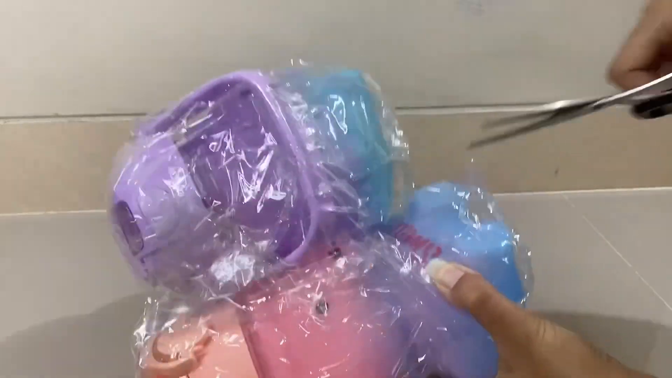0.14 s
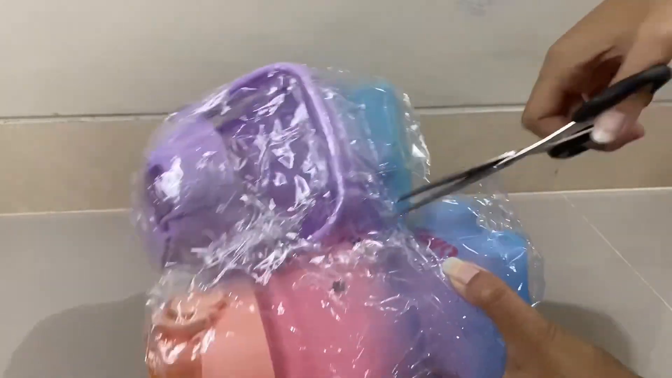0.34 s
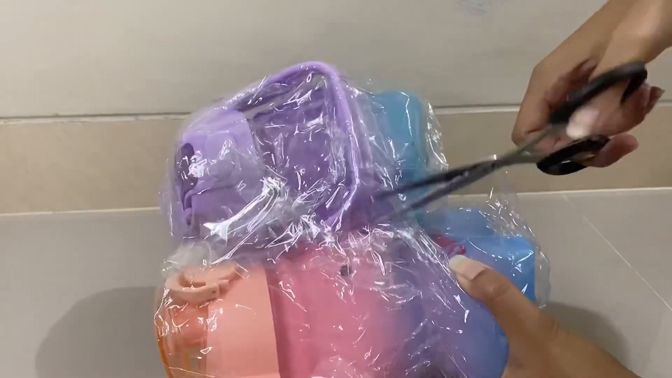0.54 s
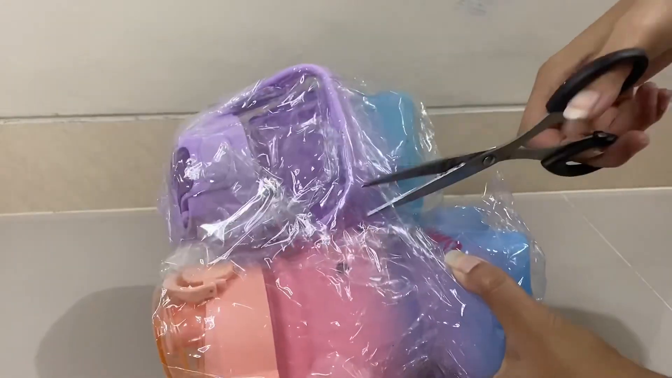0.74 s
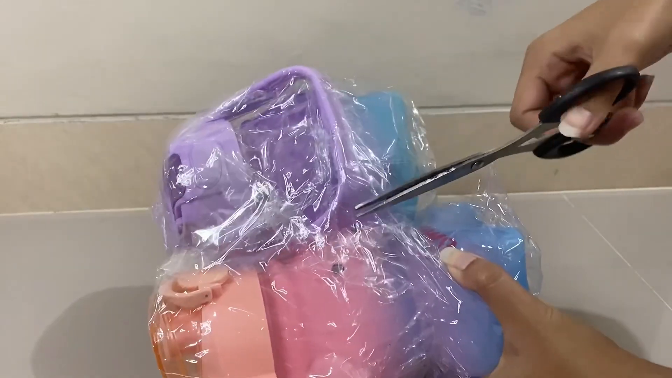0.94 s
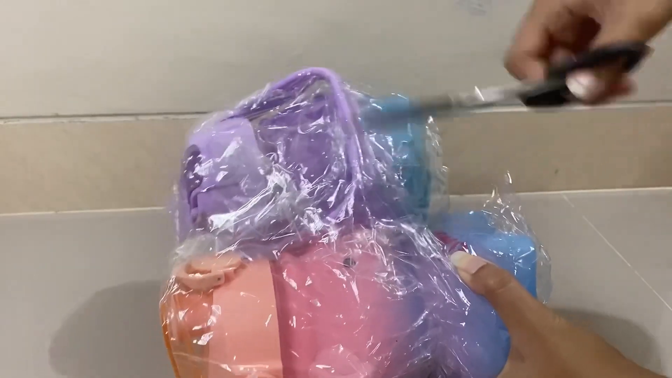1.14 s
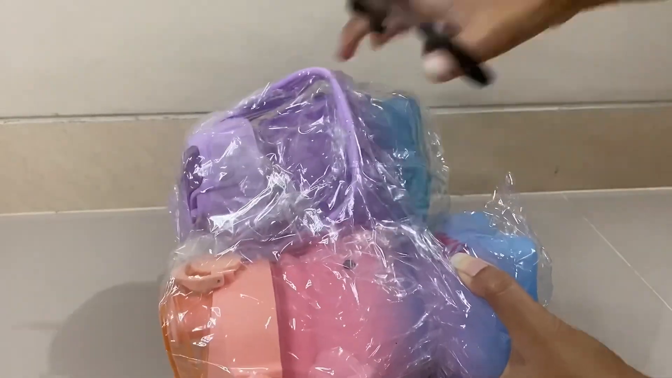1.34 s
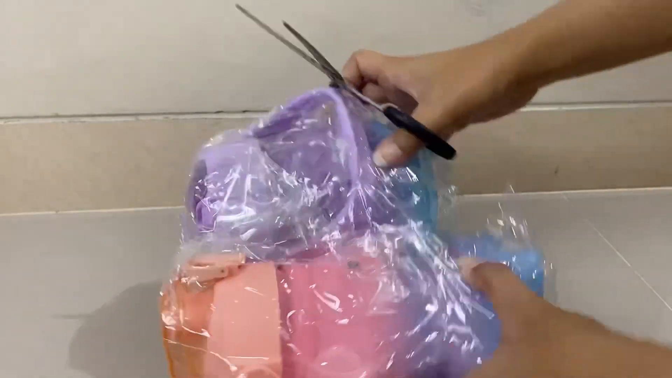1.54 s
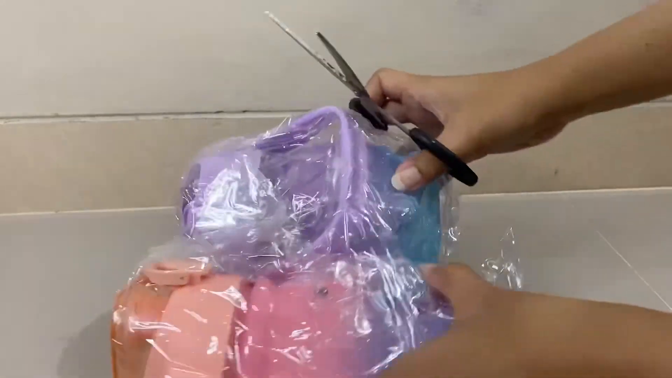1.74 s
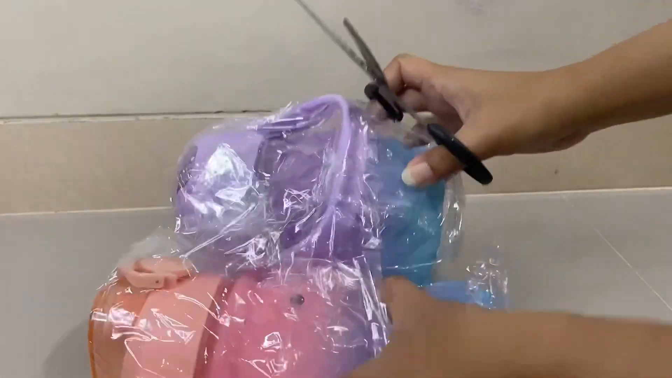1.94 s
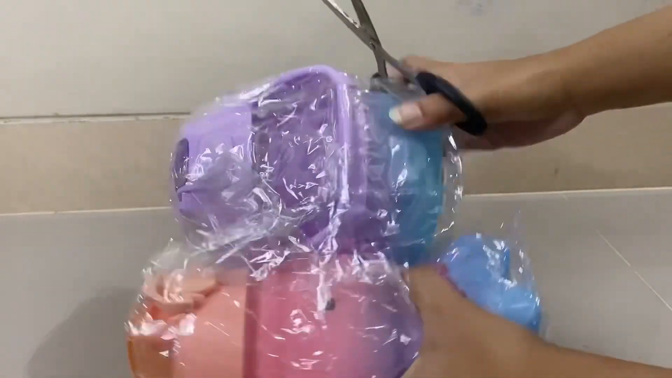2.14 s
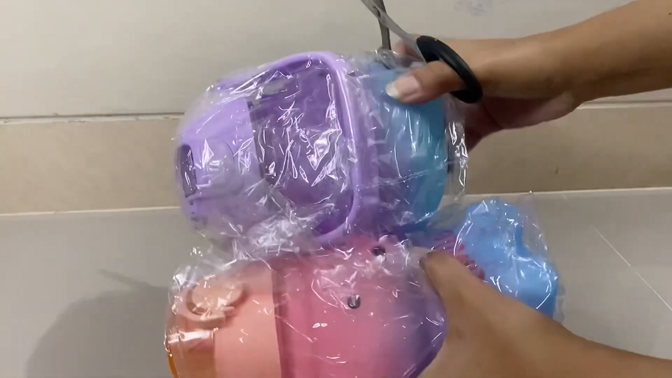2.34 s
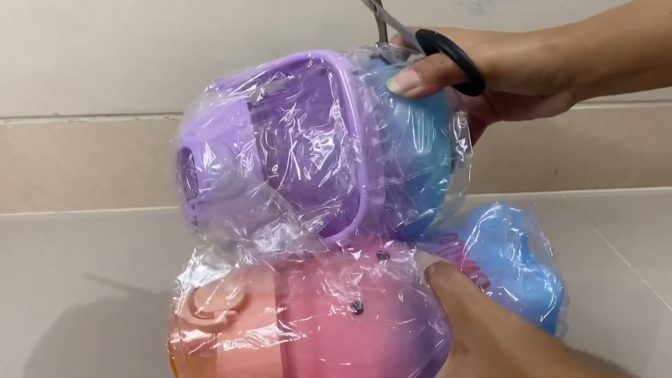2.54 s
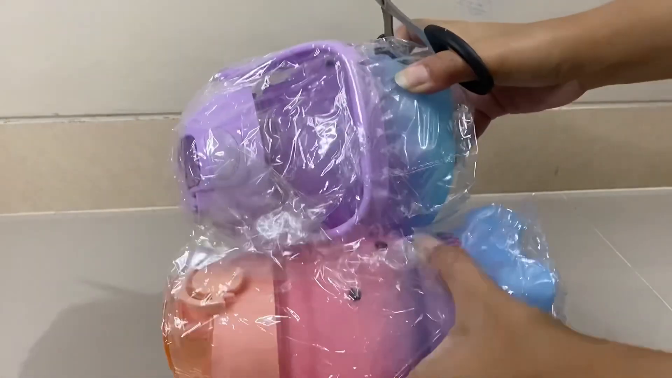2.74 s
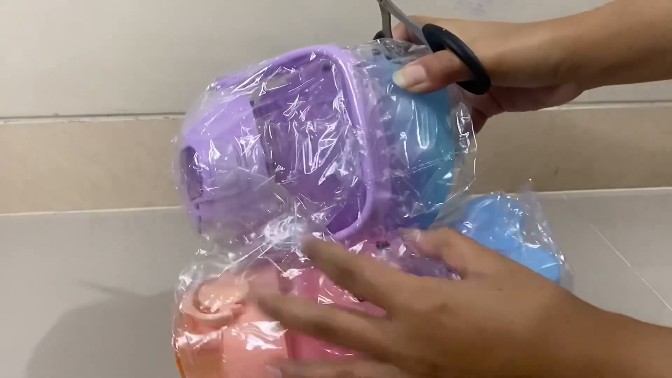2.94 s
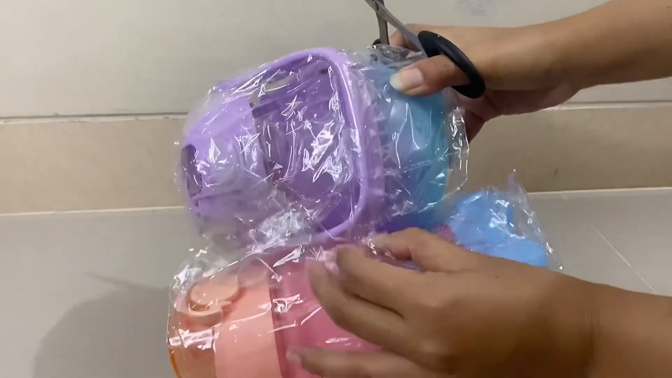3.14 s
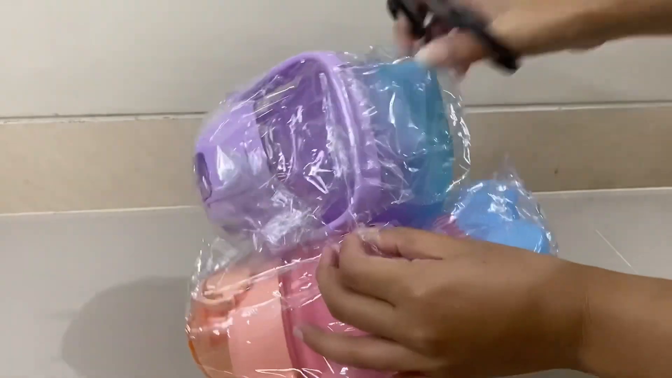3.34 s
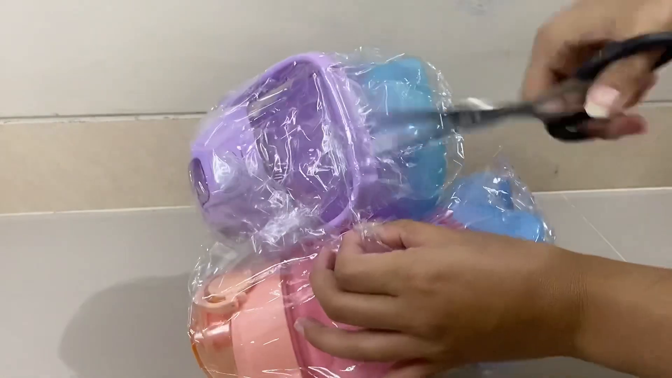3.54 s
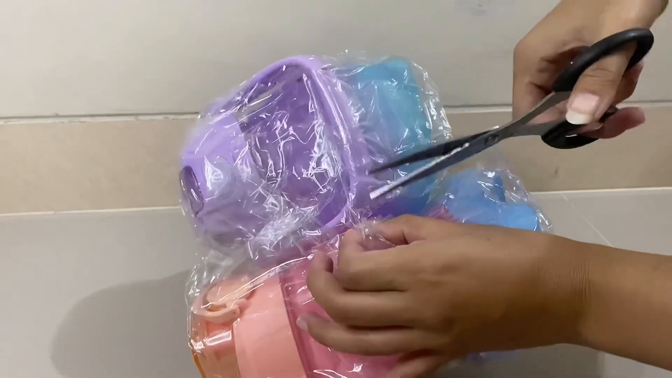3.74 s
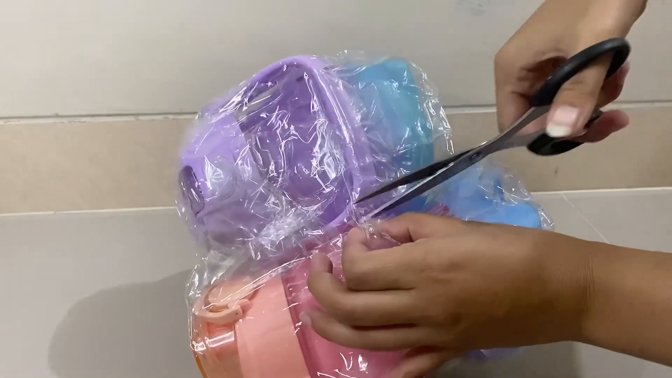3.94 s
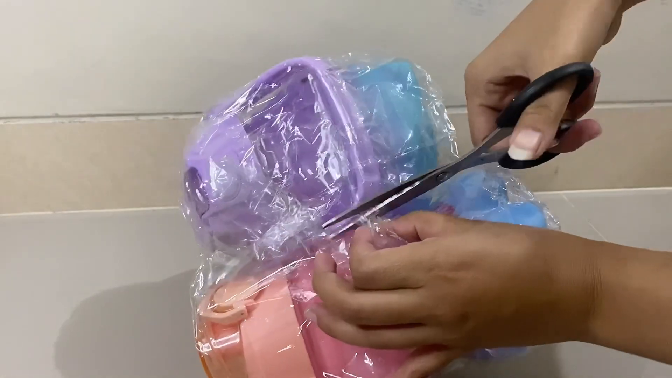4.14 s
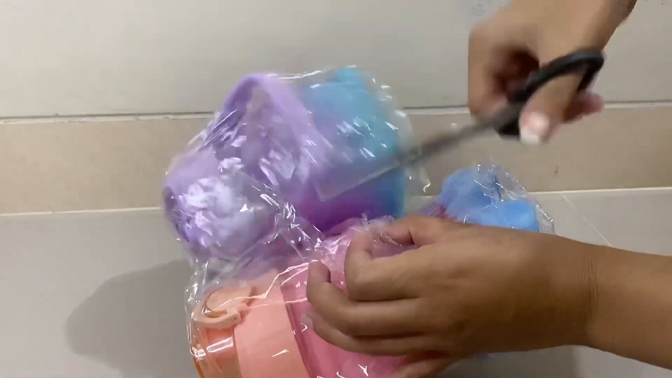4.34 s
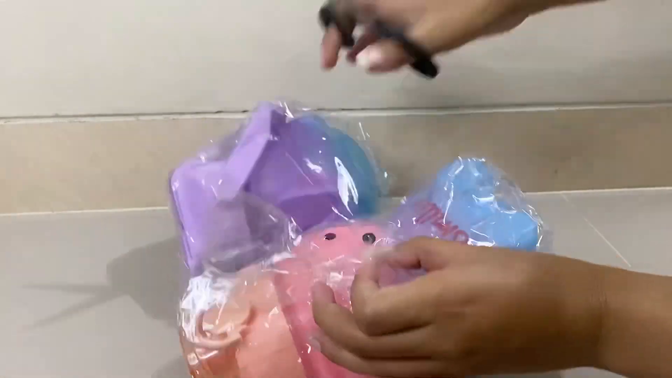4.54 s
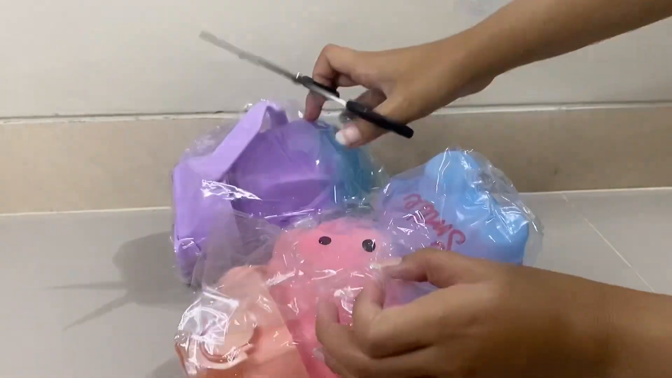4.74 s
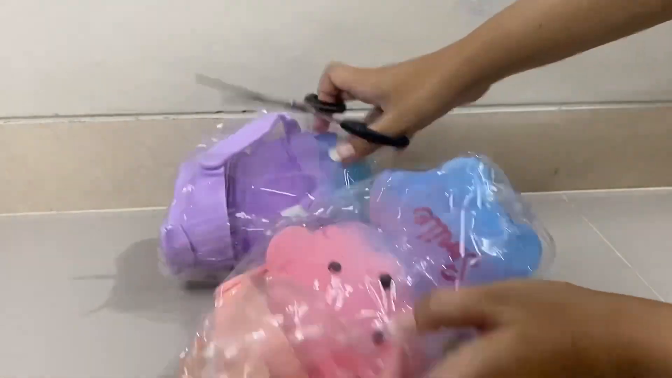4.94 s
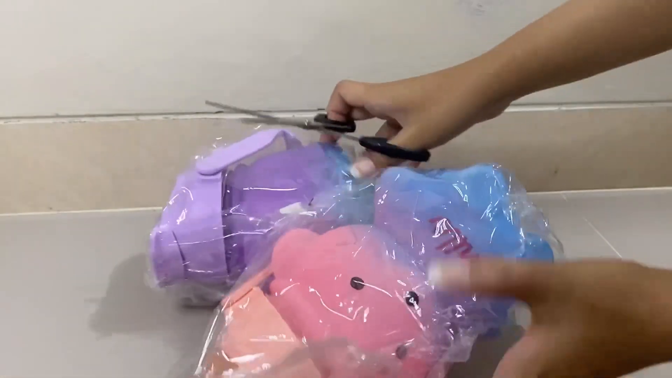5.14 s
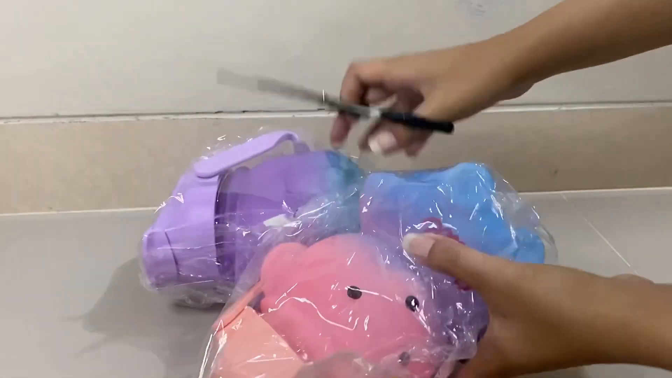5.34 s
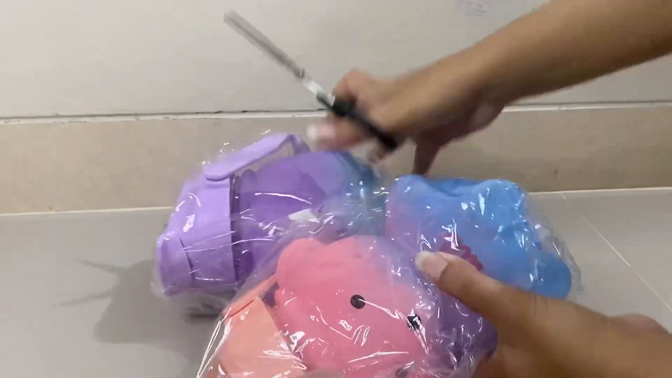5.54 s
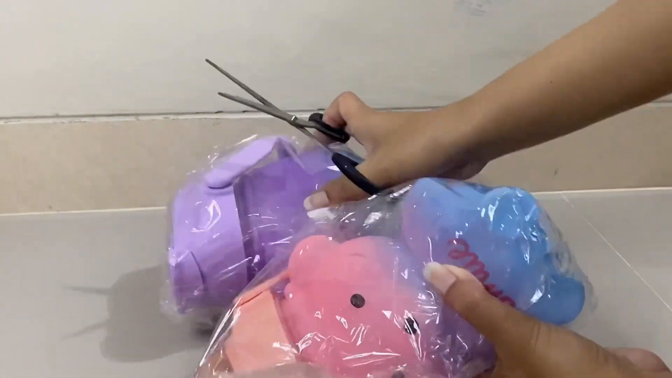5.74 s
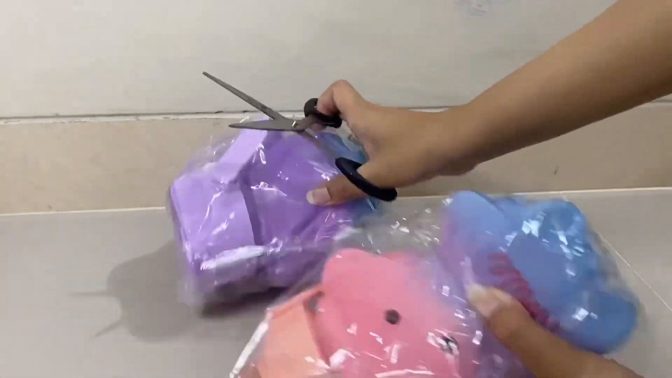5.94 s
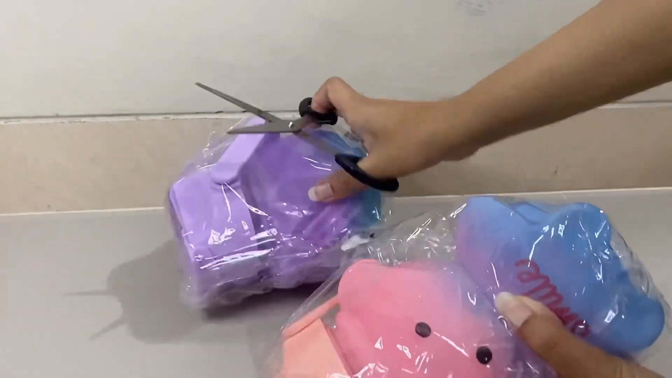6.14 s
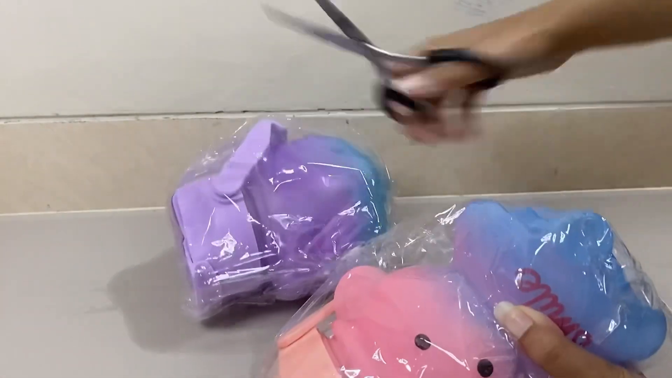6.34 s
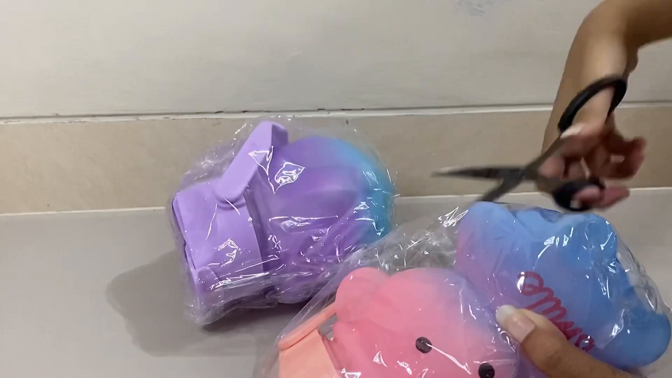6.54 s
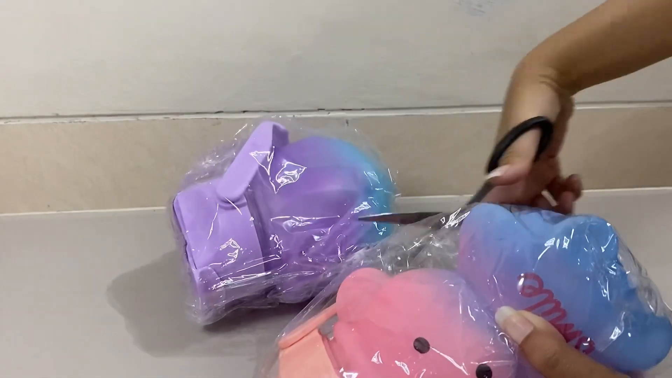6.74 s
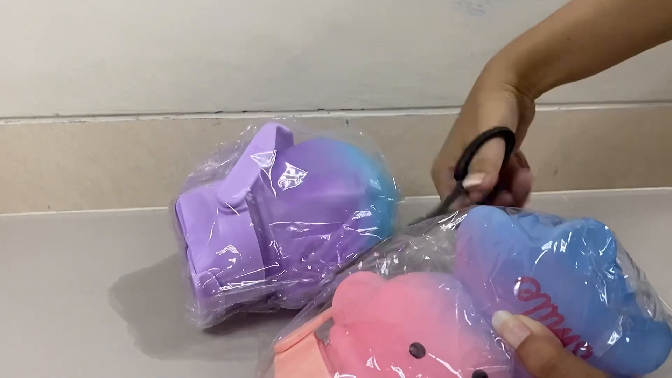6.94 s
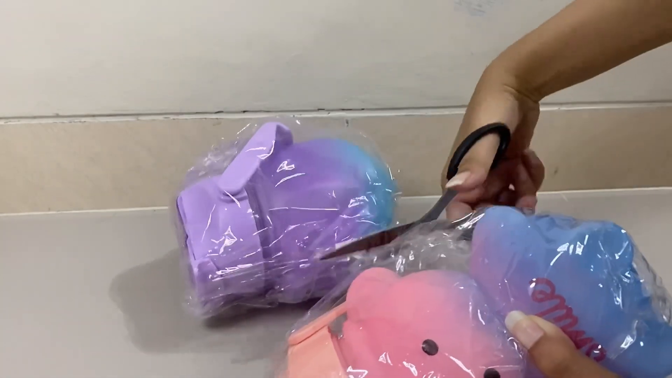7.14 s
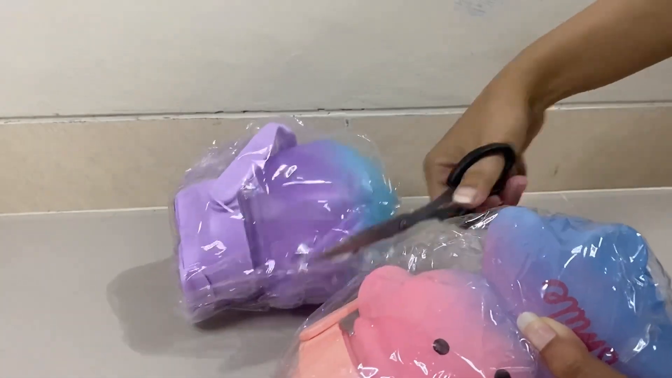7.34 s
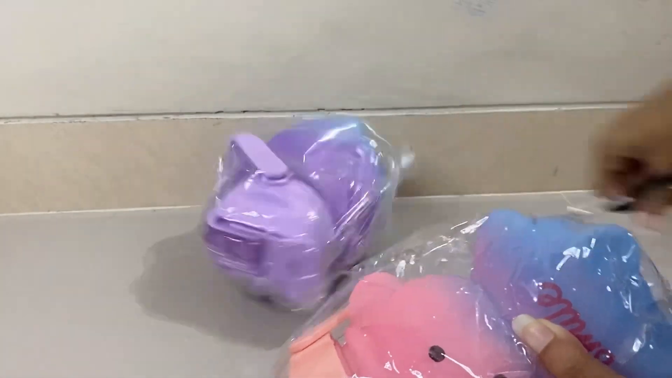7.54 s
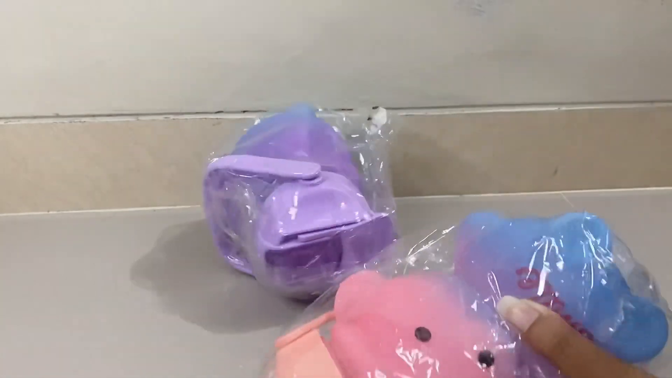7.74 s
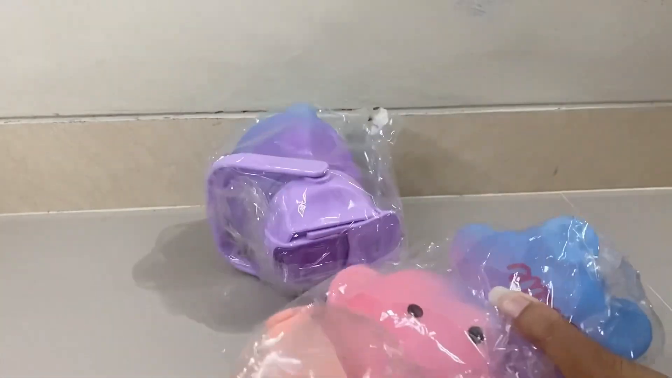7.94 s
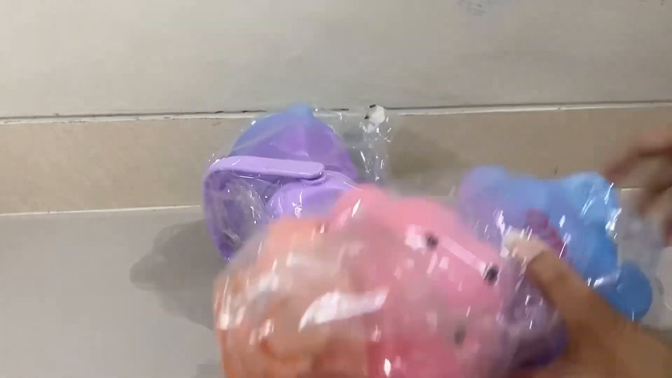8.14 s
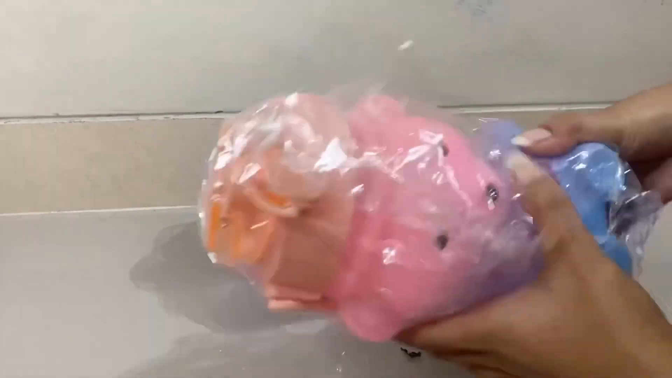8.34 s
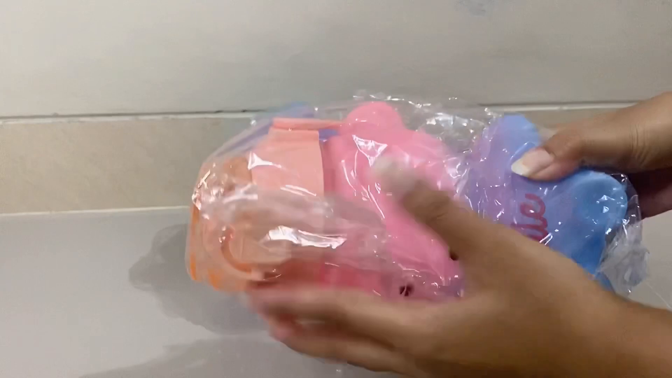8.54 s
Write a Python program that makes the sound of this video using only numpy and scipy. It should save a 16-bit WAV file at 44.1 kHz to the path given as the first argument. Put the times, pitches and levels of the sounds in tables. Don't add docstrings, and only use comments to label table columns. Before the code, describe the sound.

Scissor blades nibble lightly at thin plastic film around hollow bottles, with small ticks and squeaks. Fingers then pull hard and the crackle grows dense; a bottle thumps the table. A second cut ends in the loudest snaps and a hollow drop with bounces. More tearing, a quieter last cut and a bright lifting rustle follow. Close stereo microphone, small room, low hum.

```python
import sys
import numpy as np
from scipy import signal
from scipy.fft import rfft, irfft
from scipy.io import wavfile

SR = 44100
rng = np.random.default_rng(int(sys.argv[2]) if len(sys.argv) > 2 else 0)


def int16_out(signal):
    q = np.round(np.clip(np.atleast_2d(signal).T, -1, 1) * 32767)
    wavfile.write(sys.argv[1], SR, q.astype(np.int16))


def volts_from_db(level):
    exponent = np.asarray(level, float) / 20
    return 10 ** exponent


N = 378378

# f/Hz, slope-free gain/dB per Hz of bandwidth
FILM_COLOUR = [(130, -10.5), (340, 2.5), (600, -1.5), (900, -0.5), (1600, 3), (2900, 4), (3600, 2.5),
               (7000, 1), (9500, 2), (15000, 3.5)]

# t/s, crack level/dB, bottle push level/dB, bright edge level/dB
NIBBLING_SNAPS = [(0.0557, -30, -41, -70), (0.1046, -39, -72, -53), (0.1416, -12, -30, -22),
                  (0.2024, -18, -44, -35), (0.2873, -33, -66, -44), (0.3033, -17.5, -44, -46),
                  (0.3261, -13.5, -39, -46), (0.3503, -14, -32, -53), (0.4547, -15.5, -35.5, -22),
                  (0.505, -27, -50, -55), (0.554, -21, -35, -44), (0.5812, -17, -37, -27),
                  (0.6668, -19, -43, -22), (0.7867, -21, -50, -30), (0.8947, -20, -49, -53),
                  (0.91, -30, -41, -60), (0.9456, -35, -47, -53), (0.9839, -19, -26, -53),
                  (1.0393, -23, -43, -29), (1.066, -16.5, -31, -44), (1.1671, -22.5, -39, -23),
                  (1.2069, -29, -41, -27), (1.325, -39, -47, -56)]
PULLING_SNAPS = [(1.3847, -9, -26, -46), (1.502, -7, -28.5, -24), (1.5517, -29, -35, -16),
                 (1.5854, -34, -25.5, -14), (1.633, -11.5, -36, -14), (1.867, -18, -53, -41),
                 (1.9156, -12, -34.5, -57), (2.0994, -11.5, -27, -9), (2.173, -16, -31, -44),
                 (2.296, -14, -46, -13), (2.36, -20, -51, -40), (2.4105, -34, -62, -24),
                 (2.5945, -15.5, -37, -25), (2.6555, -33, -39, -18), (2.7477, -23, -59, -47),
                 (2.782, -29, -26.5, -56), (2.8256, -12.5, -42, -25), (2.858, -17, -34.5, -44),
                 (2.8887, -16, -46, -13), (2.91, -12.5, -34, -5.5), (2.954, -9, -40, -10),
                 (3.117, -31, -57, -19), (3.1794, -9, -35, -7), (3.3287, -14.5, -40, -16)]
CUTTING_SNAPS = [(3.5507, -20, -38, -16), (3.608, -20, -53, -27), (3.628, -28, -67, -47),
                 (3.658, -31, -61, -23), (3.6834, -18, -37, -19), (3.7247, -20, -38, -46),
                 (3.833, -18, -62, -16), (3.8608, -14, -39, -14), (3.961, -19, -45, -20),
                 (4.139, -9.5, -38, -11), (4.2083, -2, -21, 0), (4.281, -10.5, -22.5, -9),
                 (4.313, -16, -48, -18), (4.3972, -1, -9, -34), (4.4603, -7, -13, -4),
                 (4.598, -41, -33.5, -38), (4.6754, -35, -46, -19), (4.73, -25, -44, -17),
                 (4.757, -28, -46, -49), (4.7894, -25, -52, -52), (4.8672, -64, -55, -9),
                 (4.913, -37, -30.5, -8), (4.947, -18, -30, -16), (4.976, -24, -42, -22)]
TEARING_SNAPS = [(5.1593, -20, -60, -40), (5.181, -13.5, -55, -15), (5.2, -17, -36.5, -21),
                 (5.243, -21, -49, -19), (5.2881, -11, -40, -9), (5.358, -15, -62, -29),
                 (5.4535, -43, -54, -14), (5.47, -27, -56, -26), (5.5495, -6.5, -29, -9),
                 (5.634, -22, -33, -38), (5.656, -20, -50, -26), (5.7418, -40, -43, -7),
                 (5.7972, -35, -59, -27), (5.825, -12.5, -29, -14), (5.854, -13.5, -35, -8),
                 (5.894, -16, -17, -32), (5.9252, -27, -21, -39), (5.977, -12, -45, -5),
                 (6.1075, -32, -58, -36), (6.173, -26, -38.5, -14), (6.2362, -23, -57, -25),
                 (6.301, -44, -57, -61), (6.349, -39, -34, -22), (6.369, -29, -55, -30),
                 (6.416, -20, -53, -15), (6.6027, -24.5, -44, -15)]
FREEING_SNAPS = [(6.7703, -29, -37.5, -27), (6.796, -21, -34, -9), (6.877, -20, -37, -41),
                 (6.8982, -16, -31, -18), (6.9667, -24, -36, -18), (7.0163, -19, -42, -50),
                 (7.099, -22, -38, -17), (7.1862, -19, -64, -34), (7.2398, -16.5, -42, -23),
                 (7.329, -22, -48, -43), (7.4428, -18, -52, -12), (7.459, -16, -37, -23),
                 (7.4757, -12.5, -39, -13), (7.54, -25, -50, -35), (7.577, -22, -40.5, -45)]
LIFTING_SNAPS = [(7.6792, -22.5, -47, -23), (7.757, -30, -37.5, -12), (7.7996, -22, -48, -16),
                 (7.854, -27, -45, -16), (7.904, -19.5, -59, -9), (7.933, -32, -38, -10),
                 (7.972, -22.5, -43.5, -29), (8.0396, -29, -50, -22), (8.0695, -16, -65, -22),
                 (8.1174, -26, -54, -38), (8.147, -28, -58, -23), (8.162, -25.5, -60, -34),
                 (8.242, -17, -38, -12), (8.286, -17, -33, -6), (8.317, -11.5, -34, -10),
                 (8.364, -23, -62, -35), (8.3817, -30, -52, -12), (8.419, -32, -43, -30),
                 (8.474, -34, -43, -19), (8.511, -43, -57, -21), (8.5257, -14.5, -35.5, -12)]
ALL_SNAPS = (NIBBLING_SNAPS + PULLING_SNAPS + CUTTING_SNAPS
             + TEARING_SNAPS + FREEING_SNAPS + LIFTING_SNAPS)


def rms_one(x):
    return x / np.sqrt(np.mean(x ** 2) + 1e-20)


def coloured(x, spectrum):
    hz, db = np.transpose(spectrum)
    bins = np.fft.rfftfreq(N, 1 / SR) + 1
    gain = volts_from_db(np.interp(np.log(bins), np.log(hz), db))
    return irfft(rfft(x) * gain, N)


def drift(rate_hz):
    r = np.exp(-2 * np.pi * rate_hz / SR)
    wander = signal.lfilter([1], [1, -2 * r, r * r], rng.standard_normal(N + SR))
    return rms_one(wander[SR:])


def bands(x):
    bottle_top_hz, edge_bottom_hz = 1400, 8000
    hz = np.fft.rfftfreq(N, 1 / SR) + 1
    whole = rfft(x)
    low = 1 / (1 + (hz / bottle_top_hz) ** 3)
    high = 1 / (1 + (edge_bottom_hz / hz) ** 5)
    return [irfft(whole * share, N) for share in (low, 1 - low - high, high)]


def burst(clicks, rise_ms, fall_ms):
    up, down = np.exp(-1000 / SR / np.array([rise_ms, fall_ms]))
    dying = signal.lfilter([1], [1, -down], clicks + 1e-18)
    return signal.lfilter([1 - up], [1, -up], dying) * (1 + rise_ms / fall_ms)


def hum():
    # t/s, level/dB
    hum_level = [(0.0, -37), (8.51, -40.5), (8.58, -35)]
    # f/Hz, level/dB per Hz
    hum_colour = [(33, -49), (47, 13), (58, 4.5), (74, -9), (90, 6), (150, -1.5), (240, -7), (340, -16),
                  (450, -23), (1100, -25.5), (3000, -35.5), (16000, -45)]
    # f/Hz, level at the start/dB, fade/dB per s
    hum_tones = [(47.2, -62, 1.5), (76, -48, 1.5), (98.9, -62.5, -0.7), (126, -55.5, 0.3),
                 (156.7, -62.5, 1), (299.4, -59.5, 0.46)]
    t = np.arange(N) / SR
    tones = 0
    for hz, db, fade_db in hum_tones:
        level = volts_from_db(db - fade_db * t + 2.0 * drift(1.0))
        tones = tones + level * np.sin(2 * np.pi * hz * t + 0.79 * drift(0.78))
    level_t, level_db = np.transpose(hum_level)
    air = rms_one(coloured(rng.standard_normal((2, N)), hum_colour))
    return volts_from_db(np.interp(t, level_t, level_db) - 9.5) * air + tones


def effort():
    # start t/s, hold/s, effort level/dB, extra squeeze on the wall/dB
    tugs = [(-0.001, 0.18, -54.5, 15.5), (0.304, 0.07, -42.5, -4), (0.4, 0.22, -46.5, 3.5),
            (0.886, 0.052, -52.5, 2), (0.956, 0.037, -42, -2), (1.167, 0.071, -61, 1),
            (1.352, 0.016, -42.5, 0), (1.427, 0.02, -35, 5), (1.46, 0.14, -34.5, 7),
            (1.693, 0.06, -39, 7.5), (1.781, 0.42, -34.5, 6), (2.252, 0.076, -38.5, 4.5),
            (2.378, 0.17, -35, 6), (2.644, 0.12, -34.5, 4.5), (2.955, 0.31, -35, 7),
            (3.28, 0.23, -42.5, 4.5), (3.564, 0.2, -45, 4), (3.883, 0.13, -51, 13.5),
            (4.007, 0.14, -41.5, 9), (4.216, 0.14, -40, 6), (4.39, 0.15, -34.5, 12), (4.556, 0.13, -40, 8),
            (4.807, 0.27, -34, 7), (5.277, 0.06, -37.5, -2), (5.383, 0.24, -42, 5), (5.568, 0.27, -35.5, 7),
            (5.871, 0.12, -29, 14), (6.089, 0.13, -38.5, 9), (6.29, .18, -45.5, 2.5),
            (6.803, 0.25, -43.5, 9), (7.096, 0.065, -48.5, -2), (7.234, 0.26, -43, 6.5),
            (8.277, 0.13, -37, 2), (8.478, 0.13, -37.5, 3)]
    grab_db_per_s, let_go_db_per_s, rest_db = 897, 172, -63
    t = np.arange(0, N + 64, 64) / SR
    power, squeeze = volts_from_db(2 * rest_db), 0
    for s, hold_s, db, extra_db in tugs:
        grab_db = grab_db_per_s * np.maximum(s - t, 0)
        let_go_db = let_go_db_per_s * np.maximum(t - s - hold_s, 0)
        share = volts_from_db(2 * (db - grab_db - let_go_db))
        power = power + share
        squeeze = squeeze + share * extra_db
    curves = (10 * np.log10(power), squeeze / power)
    return [np.interp(np.arange(N) / SR, t, curve) for curve in curves]


def flurries(column, below_db, lead=0.12):
    flurry_ms = 18.7
    out = np.zeros(N + SR)
    t_ms = np.arange(-SR // 8, SR // 8) / SR * 1000
    swell = np.exp(-np.abs(t_ms) / np.where(t_ms < 0, lead * flurry_ms, flurry_ms))
    for row in ALL_SNAPS:
        out[round(row[0] * SR):][:len(t_ms)] += volts_from_db(row[column] + below_db) * swell
    return out[SR // 8:][:N]


def crackle(per_s=1700.0, spread_db=2.5, clump_db=2.5, patch_db=2.5, wander_db=5.5):
    mid_db, squeeze_db = effort()
    low_db = -49 + 0.75 * (mid_db + 39.0) + squeeze_db
    high_db = -44 + 1.17 * (mid_db + 40.0)
    busy = np.maximum(volts_from_db(.7 * (mid_db + 36.0)), .55)
    born = rng.random(N) < per_s * busy * volts_from_db(clump_db * drift(25.0)) / SR
    sizes = born * volts_from_db(spread_db * np.minimum(rng.exponential(1, N), 3.0)) / np.sqrt(busy)
    panels_hz = np.geomspace(700, 13000, num=9)
    dealt = rng.integers(0, len(panels_hz), N)
    out = 0
    for k, hz in enumerate(panels_hz):
        grains = burst(sizes * (dealt == k), 0.042, 1.0) * rng.standard_normal((2, N))
        b, a = signal.iirpeak(hz, 5.5, fs=SR)
        patch = volts_from_db(patch_db + wander_db * drift(7.9))
        out = out + grains + patch * signal.lfilter(b, a, grains)
    low, mid, high = [rms_one(x) for x in bands(coloured(out, FILM_COLOUR))]
    rumble = (volts_from_db(low_db - 7.0) + flurries(2, below_db=-12.0)) * low
    crunch = (volts_from_db(mid_db - 3.0) + flurries(1, below_db=-29.5)) * mid
    sizzle = (volts_from_db(high_db + 1.0) + flurries(3, below_db=-25.5)) * high
    return rumble + crunch + sizzle


def ticks(fall_ms=0.31, cycles=7.9, ring_db=-4.5, trim_db=-1.5, early_ms=0.19):
    # t/s, peak level/dB, ring f/Hz
    crease_flips = [(0.0005, -20, 1830), (0.1063, -22, 2700), (0.1428, -38, 2210), (0.2035, -18.5, 3040),
                    (0.2889, -30, 5900), (0.3271, -37, 2600), (0.3526, -15.5, 2000), (0.5049, -18.5, 2170),
                    (0.5561, -20, 2400), (0.5809, -15, 1840), (0.602, -16.5, 2180), (0.669, -24, 4700),
                    (0.7152, -19.5, 14700), (0.7868, -44, 2480), (0.8178, -30, 4470), (0.8406, -24, 2830),
                    (0.8517, -31, 4600), (0.9053, -29, 14200), (0.9115, -17, 2400), (0.9477, -21, 2140),
                    (0.9612, -14, 2070), (0.976, -17, 2300), (0.997, -25, 1500), (1.058, -31, 4100),
                    (1.0674, -17.5, 4150), (1.1258, -27, 3080), (1.1719, -27, 7500), (1.1849, -26, 1210),
                    (1.2068, -20.5, 1800), (1.3847, -16, 1580), (1.3919, -11, 4400), (1.4029, -16, 2800),
                    (1.4598, -16, 7560), (1.5541, -10, 3140), (1.6373, -28, 2700), (1.8339, -27, 15200),
                    (1.8696, -14, 3400), (2.0146, -13, 7500), (2.0374, -12, 14600), (2.1196, -3, 14100),
                    (2.1479, -13, 7500), (2.1738, -29, 1800), (2.2983, -16.5, 2480), (2.3663, -16, 2540),
                    (2.4119, -16, 5700), (2.6548, -21, 10000), (2.7487, -15, 2570), (2.8277, -16, 4560),
                    (2.9077, -22, 14200), (2.9467, -7, 14520), (2.9541, -22, 15300), (2.9742, -10, 10300),
                    (3.031, -9, 14700), (3.0406, -8, 15100), (3.1283, -24, 15300), (3.1813, -11, 1740),
                    (3.5536, -26, 1700), (3.5793, -10, 11200), (3.6012, -18, 10600), (3.6274, -17.5, 2100),
                    (3.6851, -9, 6500), (3.6937, -22, 13500), (3.8192, -25, 5700), (3.8342, -12.5, 2820),
                    (3.86, -25, 2000), (3.8749, -22, 3900), (3.9047, -19, 7100), (3.9235, -19.5, 14000),
                    (3.9566, -21, 7500), (4.0207, -16, 15300), (4.1084, -9, 13700), (4.2102, -11, 1470),
                    (4.212, -5, 14000), (4.2513, -21, 10100), (4.2781, -11.5, 1330), (4.317, -10, 14500),
                    (4.331, -15, 6600), (4.4, -2, 2450), (4.402, -12, 1200), (4.4118, -12, 1210),
                    (4.465, -15, 2200), (4.6757, -14.5, 5400), (4.6928, -16.5, 14700), (4.733, -26, 2680),
                    (4.791, -21, 2830), (4.9483, -17, 3180), (4.9775, -5, 2600), (4.9968, -19, 13600),
                    (5.0311, -23, 6700), (5.081, -15, 15200), (5.0888, -26, 8400), (5.159, -32, 4700),
                    (5.183, -23, 15400), (5.282, -6, 14600), (5.2874, -13, 8100), (5.2942, -17.5, 1190),
                    (5.3592, -14.5, 2900), (5.4614, -23, 12000), (5.4725, -22, 2600), (5.4967, -24, 15400),
                    (5.515, -11, 15200), (5.551, -27, 1810),
                    (5.557, -21, 14500), (5.5707, -17, 15300), (5.7251, -22, 9400), (5.7766, -14, 13500),
                  (5.7986, -25, 4680), (5.8534, -20, 9600), (5.896, -5, 6050), (5.922, -4, 2420),
                  (6.11, -20, 7340), (6.1738, -16, 2150), (6.227, -14.5, 14600), (6.306, -19.5, 2860),
                  (6.369, -21, 3820), (6.3804, -21, 3100), (6.415, -19, 2680), (6.4398, -9.5, 14900),
                  (6.6041, -22, 5200), (6.674, -31, 14300), (6.7917, -28, 13700), (6.7986, -14.5, 3680),
                  (6.846, -30, 2900), (6.8792, -16, 2900), (6.968, -14.5, 2820), (7.0159, -17, 1190),
                  (7.101, -18.5, 4300), (7.033, -24, 2800), (7.1882, -19.5, 2970), (7.241, -24, 2600),
                  (7.26, -27, 2900), (7.4097, -17.5, 15200), (7.483, -17, 2800), (7.5405, -21, 3200),
                  (7.5772, -18.5, 2980), (7.6873, -29, 10200), (7.758, -11, 15200), (7.8582, -19.5, 10200),
                  (7.8623, -34, 14600), (7.899, -29, 5900), (7.9038, -17, 15100), (7.9323, -25, 3800),
                  (7.9504, -16, 13300), (8.0412, -32, 9000), (8.0635, -28, 10000), (8.058, -34, 1810),
                  (8.067, -11, 3320), (8.1194, -29, 6500), (8.1503, -26, 13300), (8.1651, -26, 3260),
                  (8.2446, -10, 15000), (8.3015, -4, 13700), (8.366, -12, 4700), (8.395, -13, 9000),
                  (8.456, -18, 14800), (8.481, -15, 14900), (8.5108, -27, 14000), (8.5479, -6.5, 15000),
                  (8.5783, -11, 11300)]
    rows = crease_flips
    out = np.zeros((2, N + SR))
    t = np.arange(SR // 100) / SR
    noises = rng.standard_normal((len(rows), 2, len(t)))
    for (s, db, hz), noise in zip(rows, noises):
        spike = noise * (t / fall_ms * 1000) ** .5 * np.exp(-t / fall_ms * 1000)
        spike = signal.lfilter(*signal.butter(2, hz / 4.3, "high", fs=SR), spike)
        fade = volts_from_db(ring_db - 60 * t * np.sqrt(hz * 2000.0) / cycles / 2)
        ring = np.sin(2 * np.pi * hz * t + noise[:, :1]) * fade
        start = round((s - early_ms / 1000) * SR)
        out[:, start:][:, :len(t)] += volts_from_db(db + trim_db) * (spike + ring)
    return out[:, :N]


def bottle_rings(cycles=9.4, trim_db=-9.5, split=0.018):
    # t/s,
    # peak level/dB, f/Hz, t60/s
    squeaks = [(0.0338, -28, 2100, 0.014), (0.0486, -28, 2120, 0.014), (0.0568, -27.5, 2150, 0.014),
               (0.0625, -34, 2200, .025), (2.78, -27.5, 856, 0.025), (4.208, -12.5, 1290, .01),
               (4.3968, -18, 2200, 0.02), (4.412, -20, 620, .03), (4.459, -17, 1150, .02),
               (5.2885, -25, 900, 0.03), (5.289, -30, 1700, .02), (5.9222, -5.5, 1050, 0.012),
               (5.983, -18, 850, 0.018), (6.898, -33, 830, .02), (6.949, -33, 820, .025),
               (6.983, -33, 860, .02), (7.35, -35, 830, .02), (7.9048, -33, 380, .05)]
    wall_modes = [372, 421, 820, 900]
    free_s = 4.5
    out = np.zeros((2, N + SR))
    t = np.arange(SR // 4) / SR
    freed = np.array(ALL_SNAPS)[:, 0] > free_s
    modes = np.take(wall_modes, 2 * freed + (rng.random(len(ALL_SNAPS)) < .5))
    pushes = [(s + 0.00204, push_db + trim_db, hz, cycles / hz)
              for (s, _, push_db, _), hz in zip(ALL_SNAPS, modes)]
    pushes = pushes + squeaks
    for (s, db, hz, t60), (up, turn) in zip(pushes, rng.random((len(pushes), 2))):
        shape = volts_from_db(db) * (1 - np.exp(-t / 0.0005)) * volts_from_db(-60 * t / t60)
        for ratio in (1, 1 + split * (1 + up)):
            phase = 2 * np.pi * (hz * ratio * t + [[ratio * turn], [0]])
            out[:, round(s * SR):][:, :len(t)] += 0.88 * shape * np.sin(phase)
    return out[:, :N]


def snaps(mid_trim_db=-16.5, edge_trim_db=-13.5, puff_trim_db=-3.5, early_ms=0.09):
    s, crack_db, puff_db, edge_db = np.transpose(ALL_SNAPS)
    at = np.round((s - early_ms / 1000) * SR).astype(int)
    film = coloured(rng.standard_normal((2, N)), FILM_COLOUR)
    carriers = [rms_one(x) for x in bands(film)]
    # level/dB, rise/ms, fall/ms of puff, crack and edge
    shapes = [(puff_db + puff_trim_db, 1.1, 4.0),
              (crack_db + mid_trim_db, 1.3, 1.4),
              (edge_db + edge_trim_db, .7, .9)]
    out = 0
    for carrier, (db, rise_ms, fall_ms) in zip(carriers, shapes):
        clicks = np.zeros(N)
        clicks[at] = volts_from_db(db)
        out = out + carrier * burst(clicks, rise_ms, fall_ms)
    return out


def knocks(trim_db=-10.0, low=0.76, high=1.31):
    # t/s, peak level/dB, f/Hz, t60/s
    table_knocks = [
        (1.456, -13.5, 210, 0.049),
        (4.397, -12, 271, 0.26),
        (4.399, -18, 161, 0.73),
        (4.459, -22, 365, 0.13),
        (4.509, -18.5, 370, 0.28),
        (5.291, -24.5, 900, .2),
        (5.873, -25, 380, 0.36),
        (5.923, -17, 370, 0.15),
        (7.915, -30, 360, 0.41),
    ]
    out = np.zeros((2, N + SR))
    t = np.arange(SR // 4) / SR
    noises = rng.standard_normal((len(table_knocks), 2, len(t)))
    for (s, db, hz, t60), noise in zip(table_knocks, noises):
        around = signal.butter(2, [low * hz, high * hz], "band", fs=SR, output="sos")
        thump = rms_one(signal.sosfilt(around, noise))
        shape = volts_from_db(db + trim_db - 60 * t / t60) * (1 - np.exp(-t / 0.003))
        out[:, round(s * SR):][:, :len(t)] += shape * thump
    return out[:, :N]


def body(x, follows=0.34):
    # f/Hz, width/Hz, lift/dB
    wall_resonances = [(386.7, 19, 0.5), (840, 120, -2.5), (1990, 100, -6), (2786, 337, -4)]
    squeeze_db = effort()[1]
    walls = 0
    for hz, width, db in wall_resonances:
        b, a = signal.iirpeak(hz, hz / width, fs=SR)
        walls = walls + volts_from_db(db) * signal.lfilter(b, a, x)
    return x + volts_from_db(follows * (squeeze_db - 9)) * walls


def room(x):
    t60_s, level_db, dull_hz = 0.24, -12.5, 9700
    t = np.arange(SR // 2) / SR
    tail = rng.standard_normal((2, len(t))) * volts_from_db(-60 * t / t60_s) * (t > .003)
    tail = signal.sosfilt(signal.butter(1, dull_hz, fs=SR, output="sos"), tail)
    tail = tail / np.sqrt(np.sum(tail[0] ** 2))
    return volts_from_db(level_db) * signal.fftconvolve(x, tail, axes=1)[:, :N]


def scene():
    pack = body(crackle() + snaps()) + ticks() + bottle_rings() + knocks()
    return pack + room(pack) + hum()


def band_limit(x):
    return signal.sosfilt(signal.butter(12, 16650, fs=SR, output="sos"), x)


def record(dry):
    # f/Hz, left lead/rad, left-right level/dB, likeness/0-1
    port_pair = [(0, 0, 0, .99), (350, .3, -3, .65), (650, .5, 1, .65), (1800, 0, 1.5, .6),
                 (2800, 1, 2, .75), (5000, .7, 2.5, .15), (6600, 0, 1, .6), (8400, -3.14, 0, .9),
                 (10500, -6.6, 0, .995), (22050, -26.2, 0, .995)]
    hz, *columns = np.transpose(port_pair)
    bins = np.fft.rfftfreq(N, 1 / SR)
    lead, tilt_db, alike = [np.interp(bins, hz, column) for column in columns]
    alike = np.clip(alike, 0, 1)
    own, right = rfft(dry)
    left = (np.sqrt(alike) * right + np.sqrt(1 - alike) * own) * np.exp(1j * lead)
    ports = irfft(np.array([left * volts_from_db(tilt_db / 2), right * volts_from_db(-tilt_db / 2)]), N)
    slope = irfft(1j * left * np.linspace(0, 2, len(left)), N)
    ports[0] += 0.25 * drift(6.0) * slope
    limited = 0.8 * np.tanh(ports / 0.88)
    top_cut = signal.cheby2(12, 50, 16550, fs=SR, output="sos")
    return band_limit(signal.sosfilt(top_cut, limited))


dry = scene()
out = record(dry)
int16_out(out)
```